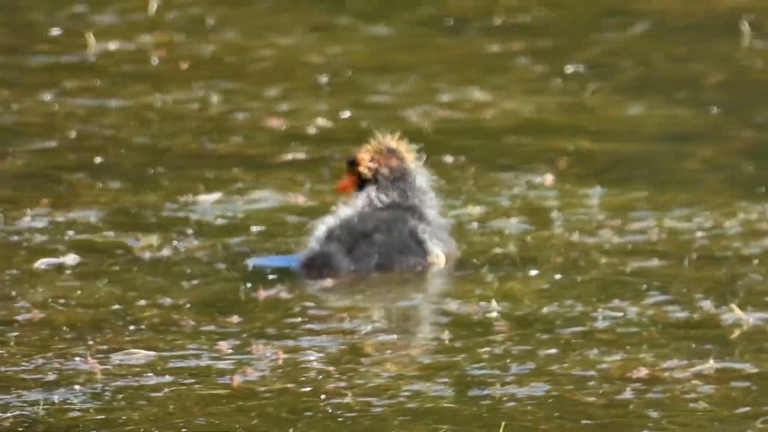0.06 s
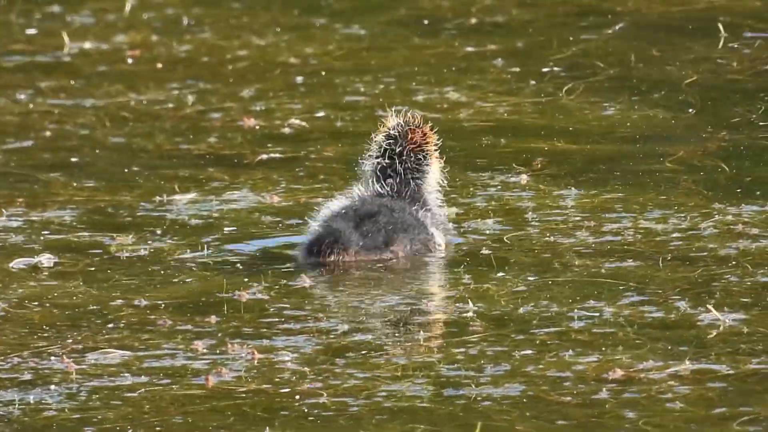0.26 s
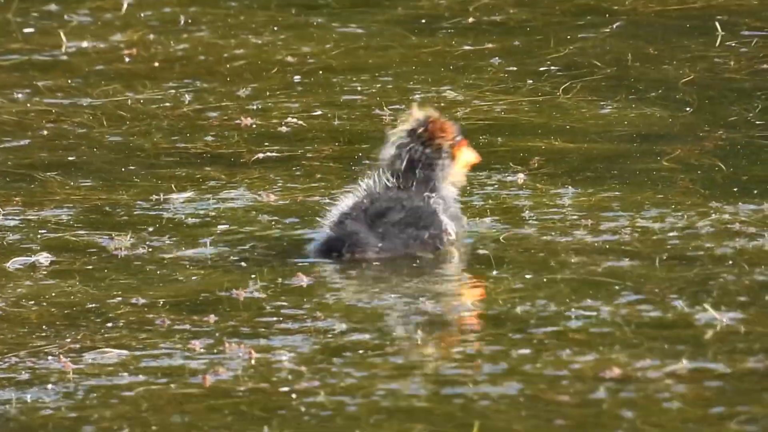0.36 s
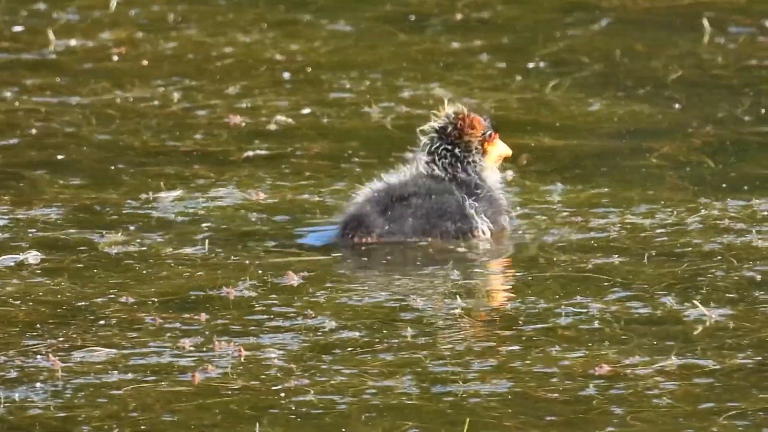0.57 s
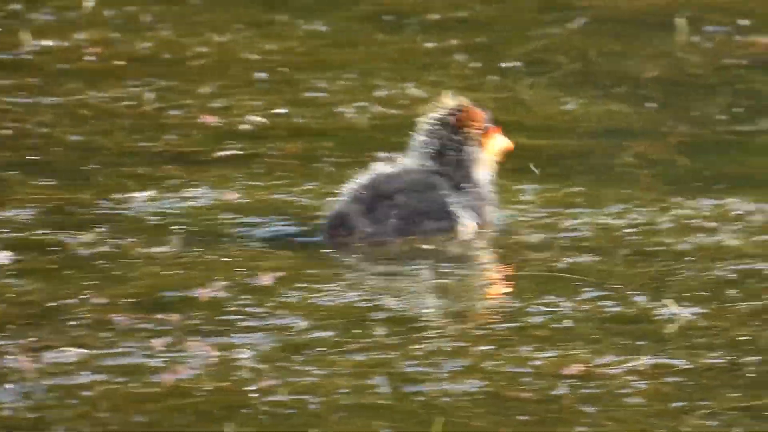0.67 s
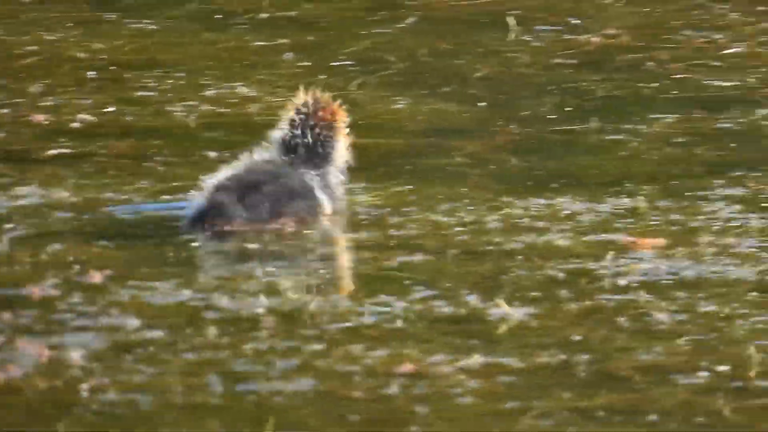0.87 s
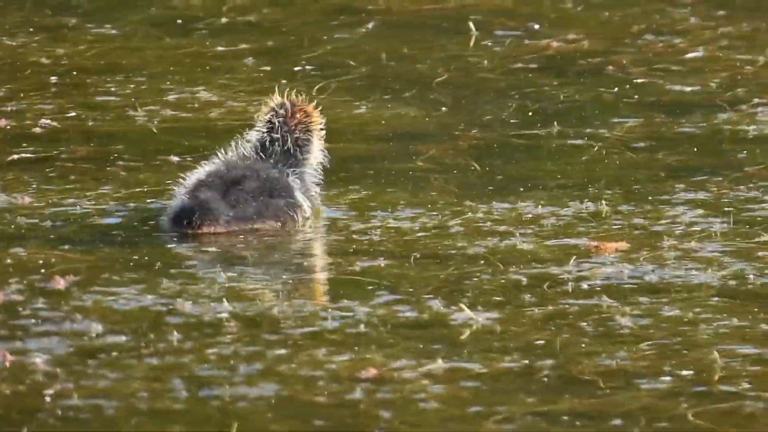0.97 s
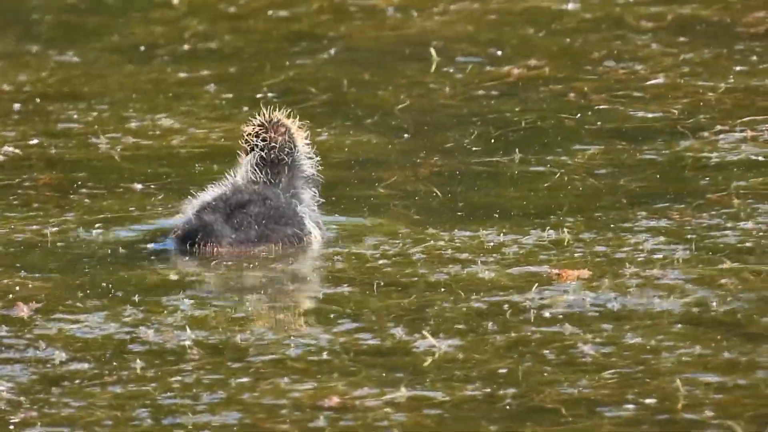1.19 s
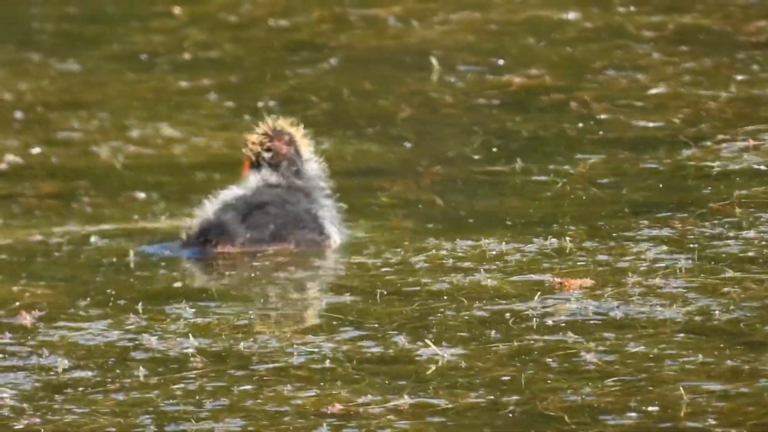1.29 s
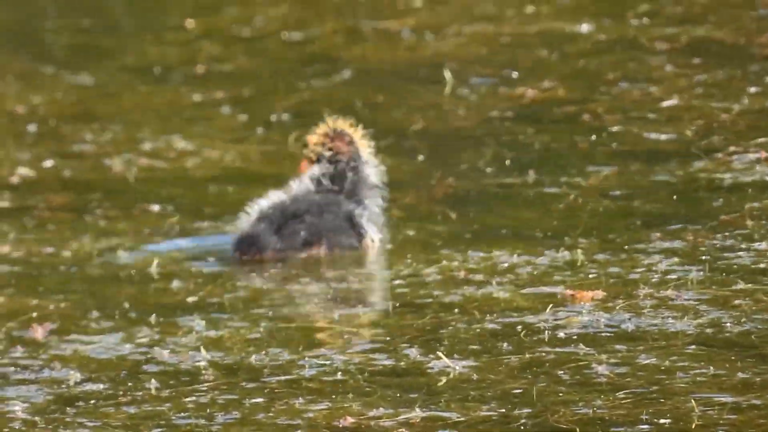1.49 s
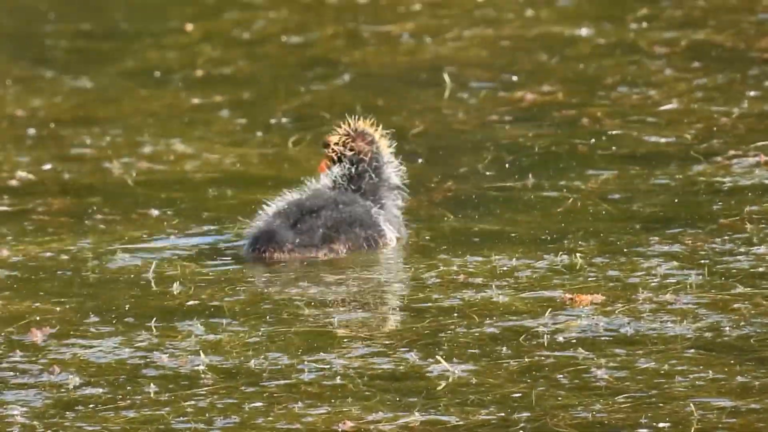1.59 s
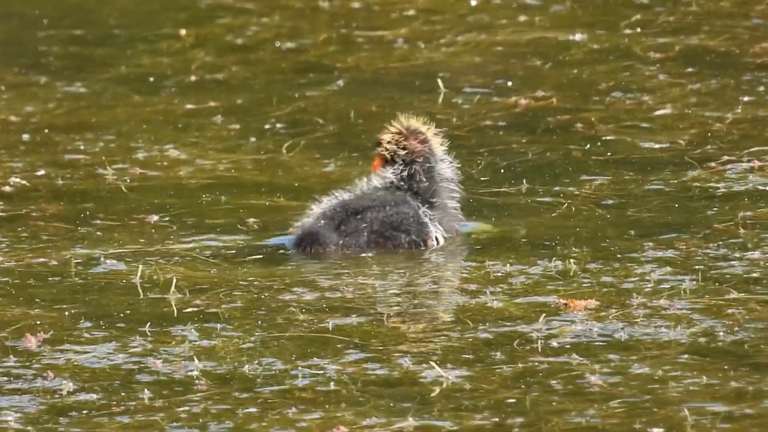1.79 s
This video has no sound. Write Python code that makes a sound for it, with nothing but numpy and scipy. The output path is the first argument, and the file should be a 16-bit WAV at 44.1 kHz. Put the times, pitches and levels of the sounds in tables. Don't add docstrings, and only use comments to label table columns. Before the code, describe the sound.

Bright bird chirps, buzz and trill burst out in the first second; afterwards only thin wind hiss, crickets, small water ticks, bubble fizz and soft hand rubs remain, in close stereo outdoors with little bass.

```python
import sys
import numpy as np
from scipy import signal
from scipy.fft import rfft, irfft
from scipy.io import wavfile
from scipy.ndimage import uniform_filter1d

SR = 44100
rng = np.random.default_rng(int(sys.argv[2]) if len(sys.argv) > 2 else 0)


def to_wav(sig):
    pcm = np.clip(np.atleast_2d(sig), -1, 1) * 32767
    pcm = np.round(pcm).astype(np.int16)
    wavfile.write(sys.argv[1], SR, pcm.T)


def invert_db(level):
    return 10 ** (np.asarray(level, dtype=float) / 20)


N = 81585
T = np.arange(N) / SR
HZ = np.maximum(np.arange(N // 2 + 1) * SR / N, 1)

# f/Hz, level/dB
REED_TONE = [(60, -35.5), (250, -12), (900, -13), (2400, -19.5), (3900, -22), (8500, -32), (11600, -42),
             (13000, -67)]
# t/s, middle range level/dB, treble level/dB
GUSTS = [(0, -1, -2), (.2, -1, -2), (.5, -0.5, 0.5), (1.0, -2.5, -1), (1.45, -2.5, -1), (1.55, 3.5, 1.5),
         (1.85, 4, -0.5)]
# t/s, level/dB
CRICKET_SWELL = [(0, -1), (.05, -0.5), (.154, 3.5), (.22, -0.5), (.4, -1), (.49, 4), (.55, -1), (.74, -2),
                 (1.2, 0.5), (1.35, -0.5), (1.5, 0.5), (1.85, -1.5)]
# middle t/s, length t/s, top f/Hz, sag at the ends f/Hz, level/dB
FAR_WHISTLES = [
    (.632, .135, 3700, 720, -58.5),
    (.292, .036, 3520, 120, -55),
    (.29, .014, 2150, 50, -53),
    (.3095, .006, 2200, 50, -55),
]
# t/s, level/dB, f/Hz, time to fade by 60 dB
# t/s
WATER_TICKS = [(.9112, -33.5, 3350, 0.01), (0.939, -38, 8100, 0.0062), (1.1, -64, 9500, .006),
               (0.9899, -37, 3260, 0.014), (1.0002, -33.5, 3250, 0.008), (1.0003, -58, 14000, 0.0044),
               (0.97, -48, 3330, 0.017), (1.2882, -37.5, 2200, 0.0013), (1.3064, -43, 2100, 0.0055),
               (1.8, -41.5, 8100, 0.0071), (1.679, -54, 11900, 0.0055), (1.7, -45.5, 7500, 0.0083),
               (0.244, -49, 9600, 0.014), (.327, -42, 2230, 0.012), (1.6, -58, 1950, 0.0087),
               (1.2884, -42.5, 1200, 0.0034), (1.5, -46.5, 3160, 0.0048), (1.3515, -45, 640, 0.0065),
               (.570, -45, 500, 0.027), (.5705, -42, 920, .01), (.5795, -44.5, 735, 0.011),
               (1.1, -53, 3300, 0.0081), (0.6, -45, 3540, .012), (1.687, -55, 10800, .005),
               (1.4, -47, 5600, .004), (1.5, -56, 3600, 0.0068), (.953, -57, 13000, .005),
               (1.3305, -52, 2150, .006), (1.818, -54, 5500, .005), (.244, -61, 11800, .004)]
# t/s, level/dB
FIZZ_LEVEL = [(.88, -91), (0.949, -65), (1.06, -94), (1.48, -78), (1.55, -66), (1.598, -59), (1.63, -65.5),
              (1.68, -63.5), (1.73, -70), (1.85, -75)]
# middle t/s, length t/s, level/dB
SPRAY_PUFFS = [
    (.945, .03, -80),
    (1.005, 0.064, -82),
    (1.58, .07, -85),
    (1.683, 0.059, -77),
]
# t/s, first level/dB, second level/dB
MOTOR_STEPS = [(.044, -43, -40.5), (.111, -45.5, -41), (.211, -46.5, -39.5), (.278, -44, -47.5),
               (.344, -44.5, -46), (.411, -35.5, -41.5), (.478, -48, -40), (.511, -45.5, -48),
               (.578, -68, -43.5), (.644, -47, -45), (.745, -49.5, -43.5), (.811, -46, -42.5),
               (.878, -48.5, -44), (.945, -54, -41), (1.045, -50, -72), (1.111, -46.5, -46),
               (1.212, -48, -45.5), (1.312, -46.5, -45), (1.379, -48.5, -41.5), (1.445, -51, -52)]
# f/Hz, level/dB, time to fade by 60 dB t/s
HOUSING_MODES = [(355.7, -4, 0.17), (300, -12.5, 0.029), (817.5, 2, 0.083), (997, -6, 0.058),
                 (1060, -2.5, 0.0094)]
# start t/s, length t/s, level/dB, top f/Hz
HAND_RUBS = [(0.428, 0.0093, -39.5, 1480), (0.519, 0.016, -43, 2660), (0.576, 0.0085, -48, 774),
             (0.816, 0.023, -45, 1840), (0.893, 0.019, -54, 800), (0.947, 0.03, -44.5, 2200),
             (0.979, 0.042, -47, 1440), (0.908, 0.0063, -48.5, 473), (0.277, 0.024, -51, 736),
             (1.047, 0.036, -54.5, 1510), (1.348, 0.013, -56, 2470), (1.45, 0.02, -52, 2200),
             (1.548, 0.011, -64, 1230), (1.592, 0.013, -77, 895), (1.627, 0.034, -47.5, 1300),
             (1.69, 0.02, -49, 1210), (1.704, 0.035, -51, 1210), (1.751, 0.022, -49, 1220),
             (1.771, .03, -52, 1210), (1.821, 0.018, -52, 1100), (1.84, 0.014, -49, 1200)]
# middle t/s, length t/s, top f/Hz, sag at the ends f/Hz, level/dB
ARCHED_NOTES = [
    (.2555, 0.038, 3528, 1241, -24),
    (.3525, 0.036, 2507, 262, -31.5),
    (.373, 0.0088, 2880, 298, -38),
    (.3895, 0.02, 2880, 520, -24),
    (.4215, 0.012, 2440, 446, -30),
    (.4835, 0.015, 2433, 117, -33),
    (.6295, 0.015, 2447, 502, -31),
    (.6905, 0.02, 2573, 624, -29.5),
    (.4925, 0.0065, 2030, -150, -42),
]
# rise over the note f/Hz, bend (power), fourth overtone level/dB
NOTE_SHAPES = [(-1, 1.8, -52), (-20, 1.97, -17), (4, 1.8, -30), (200, 1.77, -50), (5, 2.46, -43),
               (330, 1.9, -45), (-6, 1.4, -45), (-66, 1.41, -45), (-100, 1.5, -50)]
# multiple of the pitch, level at full effort/dB
OVERTONES = [(2, -36), (3, -25)]
# start t/s, length t/s, low f/Hz, level/dB
TRILL_NOTES = [
    (.7115, 0.016, 2014, -38),
    (0.7301, 0.018, 2193, -32),
    (0.745, 0.018, 2210, -32.5),
    (0.7623, 0.021, 2294, -33.5),
    (0.7825, 0.0174, 2267, -36.5),
    (0.7986, 0.019, 2125, -40.5),
    (0.819, .011, 2187, -44.5),
]
# f/Hz, level/dB, time to fade by 60 dB t/s
BUZZ_MODES = [(1945, -2, .018), (2640, 1, .012), (2900, -6, .008), (3400, -13, .006)]
# f/Hz, level/dB
THROAT_TONE = [(2300, -0.5), (3150, -1), (3550, -10), (7400, 1), (8600, -0.5), (9600, -12.5), (10500, -4.5),
               (11300, -36)]


def unit(x):
    return x / np.sqrt(np.mean(x ** 2))


def colour(x, points):
    hz, db = np.array(points, float).T
    return irfft(rfft(x) * invert_db(np.interp(np.log(HZ), np.log(hz), db)), N)


def band(x, hz, width):
    return irfft(rfft(x) * np.exp(-(np.log(HZ / hz) / width) ** 2), N)


def delay(x, seconds):
    return irfft(rfft(x) * np.exp(-2j * np.pi * HZ * seconds), N)


def ring(x, modes):
    out = 0
    for hz, db, t60 in modes:
        turn = np.exp((2j * np.pi * hz - np.log(1000) / t60) / SR)
        out = out + invert_db(db) * signal.lfilter([1], [1, -turn], x).imag
    return out


def clicks(times, sizes):
    places = np.clip(np.ravel(times) * SR, 0, N - 1).astype(int)
    return np.bincount(places, np.ravel(sizes), N)


def walk(rate):
    k = int(SR / rate)
    steps = np.repeat(rng.standard_normal(N // k + 1), k)
    return 1.5 * uniform_filter1d(uniform_filter1d(steps, k), k)[:N]


def window(start, length):
    span = slice(int(start * SR), min(int((start + length) * SR), N))
    return span, np.clip((T[span] - start) / length, 0, 1)


def place(x, pan_db, lag_s):
    return np.array([x, delay(x, lag_s) * invert_db(-pan_db)]) * invert_db(pan_db / 2)


def voice(hz, size, overtones):
    phase = 2 * np.pi * np.cumsum(hz) / SR
    effort = size / invert_db(-26)
    extra = sum(invert_db(db) * np.sin(round(k) * phase) for k, db in overtones)
    return size * (np.sin(phase) + effort * extra)


def arches(notes, shapes, overtones):
    out = np.zeros(N)
    for (mid, length, hz, sag, db), (rise, bend, fourth_db) in zip(notes, shapes):
        span, u = window(mid - length / 2, length)
        u = 2 * u - 1
        pitch = hz - sag * abs(u) ** bend + rise * u
        size = invert_db(db) * (1 - u ** 2) ** 1.15
        out[span] += voice(pitch, size, [*overtones, (4, fourth_db)])
    return out


def reeds():
    alike_hz = 2200
    out, swell, noise = 0, walk(1.1), rng.standard_normal((2, N))
    times, middle, treble = np.array(GUSTS).T
    gust_db, treble_db = np.interp(T, times, middle), np.interp(T, times, treble)
    for hz in 80 * 2 ** np.arange(0, 7.6, .75):
        mid, side = band(noise, hz, 0.33)
        db = 0.4 * swell + 1.93 * walk(9.55)
        db = db + gust_db * np.exp(-(np.log(hz / 2600) / 0.82) ** 2) + treble_db * (hz > alike_hz * 2)
        spread = np.clip(0.13 + hz / alike_hz, 0, 1.1)
        out = out + invert_db(db) * (mid + spread * side * np.array([[1], [-1]]))
    pan_db = 2 * np.array([[.5], [-.5]])
    return invert_db(-58) * unit(colour(out, REED_TONE)) * invert_db(pan_db)


def crickets():
    out = 0
    for rate_hz, side in ((94, 1), (64, -.4)):
        wander = rate_hz * (1 + 0.0485 * walk(6.31))
        throb = 1 + 0.44 * np.sin(2 * np.pi * np.cumsum(wander) / SR)
        hiss = unit(band(rng.standard_normal(N) * throb, 4682, 0.096)) * invert_db(1.5 * walk(7.44))
        out = out + place(hiss, 5 * side, 1.29 * 6e-5 * side)
    swell_db = np.interp(T, *np.array(CRICKET_SWELL).T)
    return invert_db(-61.5 + swell_db) * unit(out)


def far_birds():
    shapes = [(0, 1.9, -99), (-58, 2.6, -99), (202, 1.8, -99), (0, 1.8, -99)]
    song = arches(FAR_WHISTLES, shapes, []) * invert_db(1.8 * walk(250))
    wander = np.exp(2j * np.pi * np.cumsum(30 * walk(300)) / SR)
    return place((signal.hilbert(song) * wander).real, -1.5, 0)


def water_ticks():
    out = np.zeros(N)
    offsets = rng.uniform(-.25, .25, (len(WATER_TICKS), 4)) + [-1, -.5, .5, 1]
    for (start, db, hz, t60), cluster in zip(WATER_TICKS, offsets):
        span, u = window(start, 0.032)
        modes = [(min(hz * (1 + 0.16 * v), .44 * SR), -7, 1.24 * t60) for v in cluster]
        modes.append((hz, -5, t60))
        strike = invert_db(db - 2.0) * (np.arange(len(u)) == 0)
        edges = signal.butter(3, [hz * 0.737, min(hz * 1.29, .45 * SR)], "band", fs=SR, output="sos")
        onset = np.clip(u * 0.057 * hz, 0, 1)
        out[span] += signal.sosfilt(edges, ring(strike, modes)) * onset
    return place(out, 5, 6e-5)


def water_fizz():
    rate = 3000
    pops = (rng.random((2, N)) < rate / SR) * rng.standard_normal((2, N))
    fizz = unit(band(pops, 6330, 0.59)) * invert_db(np.interp(T, *np.array(FIZZ_LEVEL).T))
    fizz = signal.sosfilt(signal.butter(8, 11500, fs=SR, output="sos"), fizz)
    swell = 0
    for mid, length, db in SPRAY_PUFFS:
        swell = swell + invert_db(db) * np.clip(1 - (2 * (T - mid) / length) ** 4, 0, 1)
    return fizz + swell * unit(band(pops, 13200, 0.098))


def lens_motor(grain):
    gap_s, push_s, swell_s = 0.0125, .0013, .006
    times, first_db, second_db = np.array(MOTOR_STEPS).T
    push = np.hanning(int(push_s * SR)) * 2 / (push_s * SR)
    pushes = np.zeros((3, N))
    for k, db in enumerate([first_db + 4, second_db, second_db - 12.5]):
        pushes[k] = np.convolve(clicks(times + k * gap_s, invert_db(db - 2.5)), push)[:N]
    pushes = np.gradient(pushes, axis=1) * 11 + 0.22 * 10 * pushes * grain
    damped = ring(pushes[0], [(hz, db, t60 * 0.37) for hz, db, t60 in HOUSING_MODES])
    t = T[:SR // 5]
    swelling = ring(t == 0, HOUSING_MODES) * np.clip(t / swell_s, 0, 1) * invert_db(1.5)
    return damped + signal.fftconvolve(pushes[1] + pushes[2], swelling)[:N]


def hand_rubs(grain):
    rubs, grain = np.zeros((2, N)), grain * invert_db(0.5 * walk(300))
    for start, length, db, top_hz in HAND_RUBS:
        span, u = window(start, length)
        low_hz = 620 if start > 1.5 else 260
        edges = signal.butter(2, [low_hz, top_hz], "band", fs=SR, output="sos")
        rub = signal.sosfilt(edges, grain[:, span] * np.sin(np.pi * u ** 0.76))
        rubs[:, span] += invert_db(db - 7) * unit(rub)
    return rubs + invert_db(-13) * ring(rubs, HOUSING_MODES) / 30


def camera():
    grain = rng.standard_normal((2, N))
    motor, rubs = lens_motor(grain[0]), hand_rubs(grain)
    side = invert_db(-10) * (rubs[1] + np.roll(motor, 40)) * np.array([[1], [-1]])
    body = place(motor + rubs[0], 0.81, 4e-5) + side
    return signal.sosfilt(signal.butter(3, 230, "high", fs=SR, output="sos"), body)


def trill():
    out = np.zeros(N)
    for start, length, hz, db in TRILL_NOTES:
        span, u = window(start, length)
        pitch = hz + 338 * np.exp(-u / 0.18) + 370 * u ** 4.7
        closing = np.clip((u - 0.82) / .06 + 1, 0, 1)
        gate = np.clip(np.minimum(u, 1 - u) * length / .0016, 0, 1)
        out[span] += voice(pitch, gate * invert_db(db - 6 * u - 11 * closing), OVERTONES)
    return out


def buzz():
    start_s, end_s, rate_hz, push_s = .495, .594, 138.6, .003
    late, uneven = rng.standard_normal((2, 30))
    times = start_s + (np.arange(30) + 0.02 * late) / rate_hz
    effort = (times - start_s) / (end_s - start_s)
    t, out = T[:SR // 40], 0
    for modes, swell_db in ((BUZZ_MODES[:1], 2), (BUZZ_MODES[1:], 11)):
        size = (effort < 1) * invert_db(-46.5 + swell_db * effort ** 2 + 1.0 * uneven)
        pulse = ring(t == 0, modes) * np.clip(t / push_s, 0, 1) ** 2
        out = out + 3 * np.convolve(clicks(times - push_s / 2, size), pulse)[:N]
    return out * (1 + 0.15 * walk(900))


def warbler():
    notes = arches(ARCHED_NOTES, NOTE_SHAPES, OVERTONES)
    song = colour(notes + trill(), THROAT_TONE) + buzz()
    song = song + invert_db(-15) * delay(song, 0.0023)
    t = T[:SR // 4]
    tail = rng.standard_normal((2, SR // 4)) * invert_db(-60 * t / 0.15) * np.clip(t / 0.0019, 0, 1)
    tail = tail / np.sqrt(np.sum(tail[0] ** 2))
    scattered = signal.fftconvolve(song[None], tail, axes=1)[:, :N] * np.array([[1], [.6]])
    return place(song, 8, 9.5e-5) * invert_db(-1.5) + invert_db(-11) * scattered


def scene():
    background = reeds() + crickets() + far_birds()
    water = water_ticks() + water_fizz()
    return background + water + camera() + warbler()


def roll_off(x):
    return signal.sosfilt(signal.butter(12, 15710, fs=SR, output="sos"), x)


def record(dry):
    mix = signal.sosfilt(signal.butter(3, 190, "high", fs=SR, output="sos"), dry)
    return roll_off(mix)


dry = scene()
out = record(dry)
to_wav(out)
```